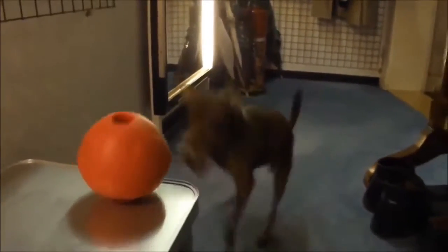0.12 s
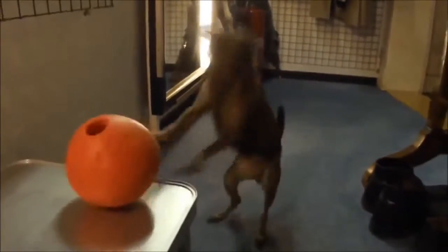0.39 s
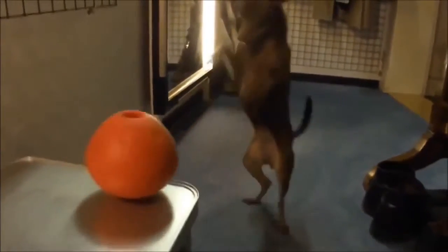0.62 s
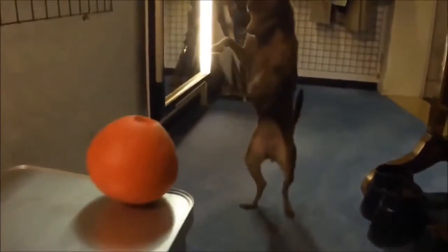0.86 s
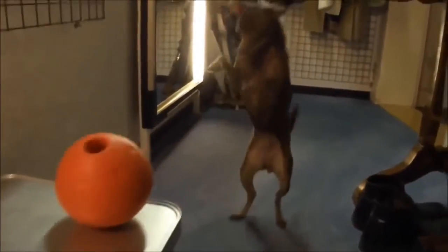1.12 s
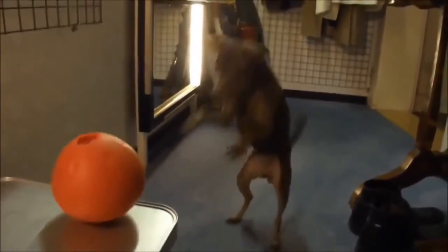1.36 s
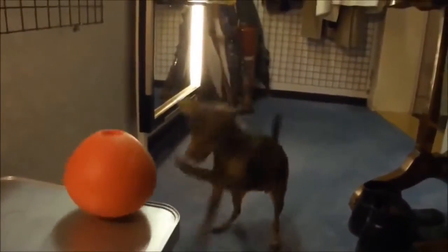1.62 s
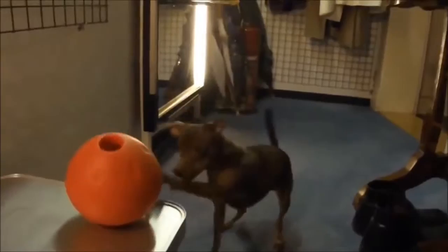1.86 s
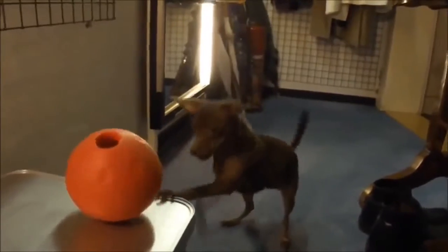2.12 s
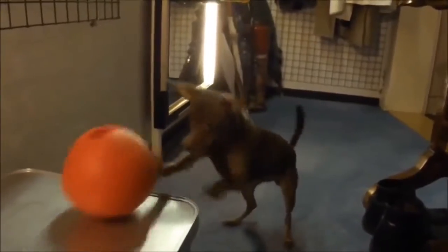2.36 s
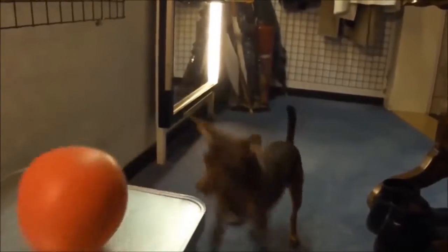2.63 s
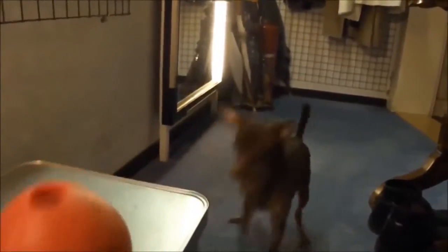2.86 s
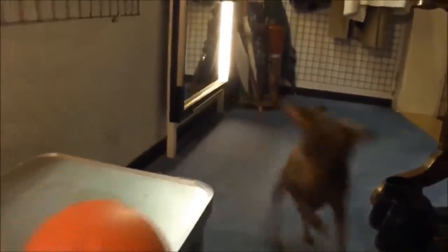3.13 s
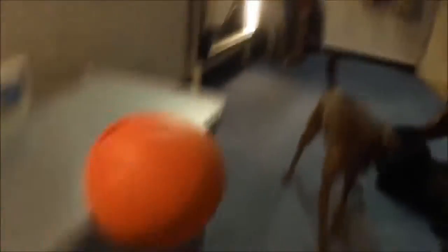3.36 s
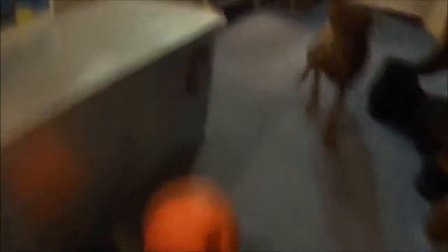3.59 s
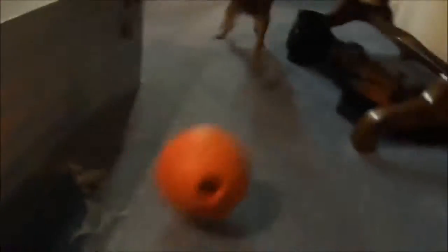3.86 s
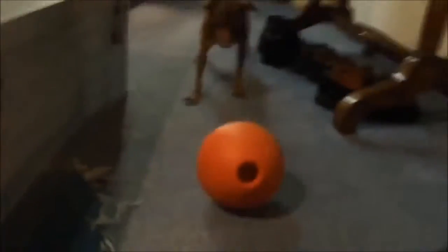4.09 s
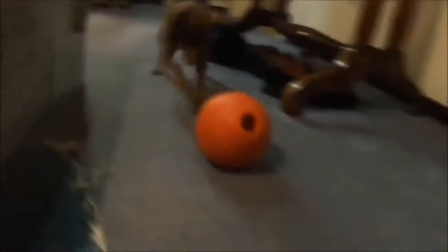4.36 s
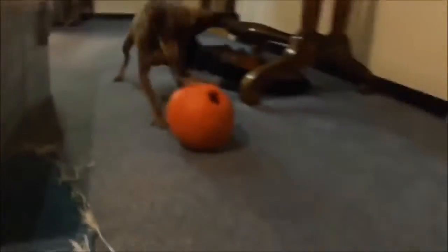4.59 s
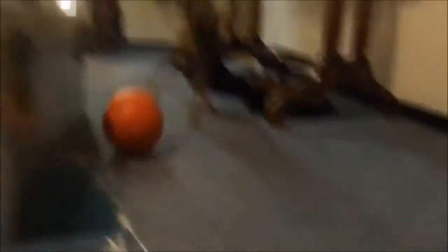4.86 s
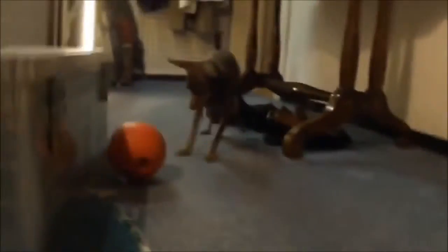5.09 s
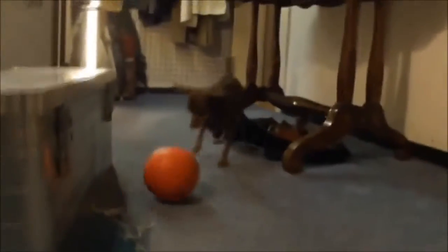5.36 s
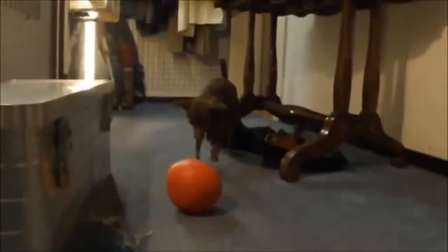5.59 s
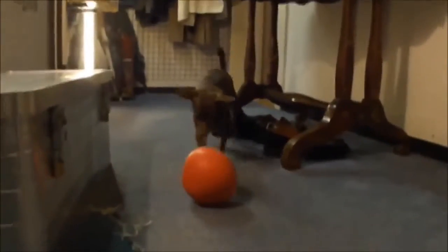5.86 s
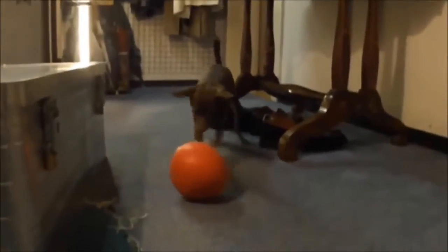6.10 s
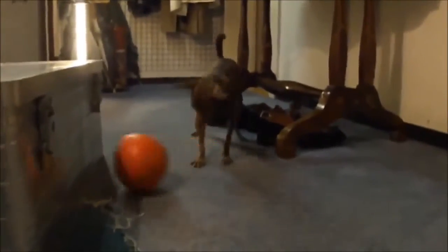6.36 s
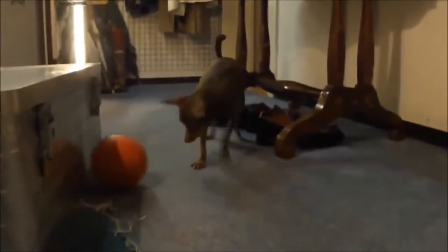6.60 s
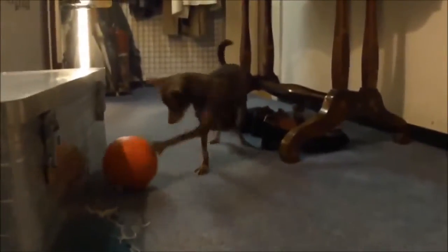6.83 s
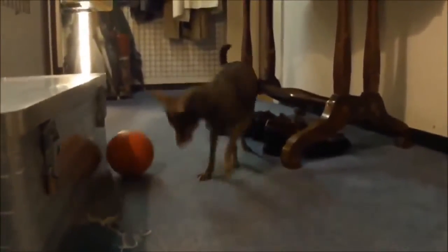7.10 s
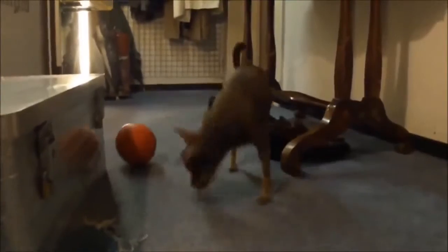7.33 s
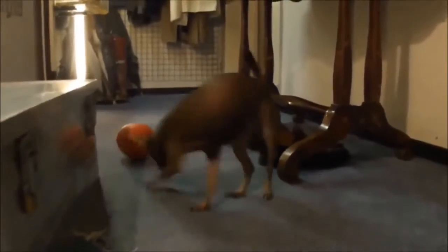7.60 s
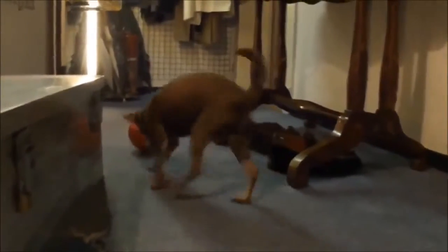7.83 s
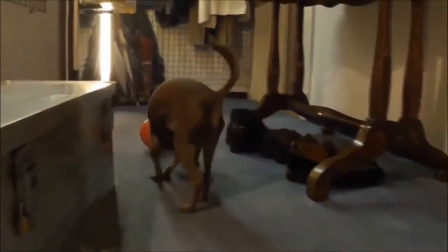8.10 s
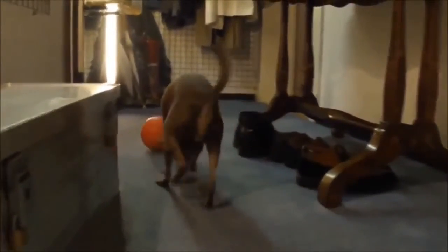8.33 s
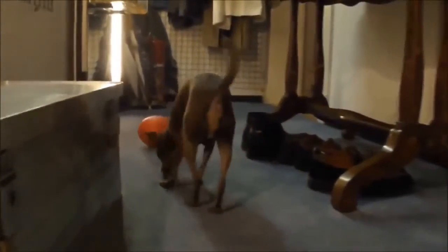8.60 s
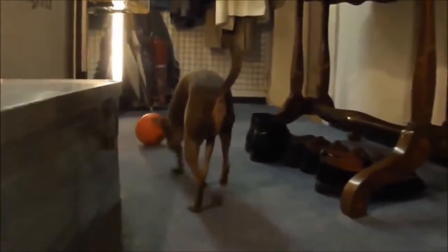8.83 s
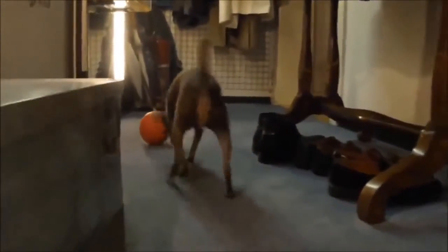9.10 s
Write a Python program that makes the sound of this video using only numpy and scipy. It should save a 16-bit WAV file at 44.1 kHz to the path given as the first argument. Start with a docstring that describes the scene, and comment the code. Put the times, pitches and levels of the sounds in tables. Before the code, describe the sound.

Soft brushing and sparse hollow taps come first, with claws clicking on a metal lid. A busier rattle of pellets leads to two nearly joined, very loud thumps on carpet, more bounces, then rumbling roll and booming knocks against the metal chest. Small scrabbles and ticks end it. Close stereo microphone with a coloured, boxy tone, short room reflections and faint air noise.

```python
"""A small dog brushes past and paws a hollow plastic ball of dry pellets about on a metal chest: low pushes
ring the ball, swelling noise is the thrown pellets, short tocks are single pellets, bright noise is claws.
At 3.7 s the ball leaves the lid and bounces on a thin carpet with the hardest thumps. Then it rolls, in
rumbling and hissing noise with brief tones, and slams into the chest; the last ticks come after 9 s.
Throughout, a small furnished room answers in fading noise, air murmurs, and a narrow microphone colours all."""
import sys
import numpy as np
from scipy import signal
from scipy.fft import rfft, irfft, next_fast_len
from scipy.io import wavfile
from scipy.ndimage import uniform_filter1d

SR = 44100
rng = np.random.default_rng(int(sys.argv[2]) if len(sys.argv) > 2 else 0)


def invert_db(level):
    """Linear amplitude ratio for a level in decibels (20 dB per decade), elementwise."""
    return 10 ** (np.asarray(level, dtype=float) / 20)


def bounce(signal):
    """Save signal as a 16-bit WAV file at the path given by the first command-line argument."""
    frames = np.transpose(np.atleast_2d(signal))
    limited = np.clip(frames, -1, 1)
    pcm = np.round(limited * 32767).astype(np.int16)
    wavfile.write(sys.argv[1], SR, pcm)


N = 406155  # samples in the scene

# Levels in the event tables are those at the source, before the room and the microphone.
# ball and paws landing: (time [s], push [dB], pitch [Hz], shudder [dB], thrown pellets [dB])
THUMPS = [(0.465, -27.5, 654, -48, -34), (0.617, -37, 840, -49, -34), (0.661, -31, 560, -35, -34),
          (0.705, -36, 300, -38, -40), (0.95, -52, 795, -56, -50), (1.051, -24.5, 427, -44, -62),
          (1.16, -27, 363, -44, -52.5), (1.49, -42, 700, -52, -52), (1.62, -48, 600, -60, -48),
          (1.831, -24, 614, -36, -40), (1.932, -32, 455, -37, -41.5), (2.13, -32, 272, -44.5, -46.5),
          (2.234, -13.5, 503, -27, -36.5), (2.575, -40, 606, -45, -60), (2.621, -26, 570, -37, -32),
          (2.72, -34, 568, -37.5, -32), (2.751, -24, 480, -30, -26), (2.768, -14, 540, -29.5, -35),
          (2.864, -11, 700, -35.5, -28), (3.077, -27, 496, -38, -40), (3.35, -41, 460, -49, -39),
          (3.419, -50, 510, -42, -35), (3.544, -29, 460, -53, -31.5), (3.595, -37, 832, -45, -34),
          (3.909, 5, 684, -12.5, -15), (3.949, 2, 760, -21.5, -16.5), (4.182, -1, 280, -18, -14),
          (4.329, -11, 329, -25, -22.5), (4.416, -20.5, 319, -39, -44), (4.814, -40.5, 850, -42, -34),
          (4.876, -31.5, 292, -35, -27), (5.316, -5, 420, -11.5, -12), (5.524, -21, 464, -36, -31.5),
          (5.608, -28, 356, -34, -40), (5.921, -39, 360, -47.5, -51), (6.017, -41, 860, -42, -38),
          (6.09, -30, 885, -45.5, -44), (6.169, -30, 824, -46, -30), (6.367, -27, 300, -38, -35.5),
          (6.459, -29.5, 442, -47, -37.5), (6.753, -35, 438, -52, -46), (6.868, -3.5, 434, -18.5, -20),
          (6.891, -11, 375, -25, -22), (6.997, -18, 466, -37, -32), (7.115, -14, 380, -32.5, -34),
          (7.29, -3.5, 420, -17.5, -20), (7.517, -22.5, 417, -43, -39), (8.032, -39, 716, -49, -34),
          (8.128, -44, 344, -48.5, -40), (8.239, -34, 708, -56, -42.5), (8.479, -55, 643, -55, -42),
          (8.605, -36, 662, -48.5, -39.5), (8.757, -35.5, 856, -59, -43.5)]
# single pellets on the shell: (time [s], level [dB], pitch [Hz], shell ring relative to the tock [dB])
TICKS = [(0.471, -34.5, 950, -17), (0.617, -29, 1860, -17), (0.653, -14, 1830, -17), (0.937, -30, 820, -16),
         (1.054, -33.5, 895, -11), (2.14, -25, 1574, 3), (2.239, -19.5, 1470, 5), (2.396, -27.5, 2160, -30),
         (2.623, -18, 1560, 1.5), (2.715, -22, 1900, -14), (2.737, -26, 1620, 5), (2.756, -18, 1550, -6),
         (2.866, -20, 1700, -10), (2.918, -23.5, 1840, -21), (2.991, -27, 942, -19),
         (3.034, -20, 1950, -2.5), (3.09, -24, 1640, -11), (3.123, -30, 1600, -28), (3.152, -28, 1700, -21),
         (3.184, -17, 2200, -12), (3.26, -12, 1920, -24), (3.342, -13.5, 1800, -8.5),
         (3.382, -22, 1900, -9), (3.427, -19, 1760, -21.5), (3.403, -29, 1700, -15), (3.52, -31, 900, -20),
         (3.549, -22.5, 1740, -24), (3.666, -28, 1700, -15), (3.795, -32, 1990, -15),
         (3.842, -33, 1860, -8), (3.913, -9.5, 1010, 11.5), (4.043, -12, 1870, -10.5), (4.17, -26, 1000, 1),
         (4.186, -8, 1040, -6), (4.2378, -11.5, 2170, -17), (4.328, -22, 1010, -12),
         (4.362, -14.5, 1830, -16), (4.444, -20.5, 2130, -14), (4.504, -23.5, 1880, -4.5),
         (4.804, -30, 950, -14), (4.82, -10, 1050, -20), (4.885, -10, 1890, -12.5), (5.319, -1, 905, -17),
         (5.422, -12.5, 1010, -14), (5.524, -18.5, 1510, 4), (5.61, -25, 1080, -1), (5.676, -30, 1010, -18),
         (5.745, -33, 1087, 15), (5.848, -30.5, 1000, 12), (5.974, -23, 885, -21), (6.022, -28, 996, -14),
         (6.043, -23, 960, -21), (6.095, -25.5, 980, -17), (6.159, -26, 1640, -9),
         (6.175, -17.5, 1610, -12), (6.368, -18.5, 2090, -9), (6.46, -29, 1260, -1), (6.74, -27, 2010, -23),
         (6.758, -23, 1950, -19), (6.8, -32, 1940, -12), (6.873, -3.5, 815, -16), (6.892, -5.5, 980, -17),
         (6.973, -16, 1300, 4), (7.0, -24.5, 1430, -7), (7.121, -20, 1900, -4), (7.27, -36, 1500, -14),
         (7.294, -11, 1140, -16), (7.482, -22.5, 1600, -20), (7.518, -29, 1790, -19),
         (7.559, -17, 2570, -12), (7.592, -26, 1840, -15), (7.989, -38.5, 1080, 14), (8.038, -36, 990, 8),
         (8.08, -30, 1900, -12), (8.12, -26, 2010, -12), (8.158, -30, 2100, -12), (8.191, -30, 2200, -12),
         (8.234, -32, 2200, -14), (8.403, -38, 1850, -8), (8.46, -37, 1920, -4), (8.477, -25, 1940, -17),
         (8.557, -25, 1030, -12), (8.611, -27, 1640, -15), (8.687, -32.5, 1730, -11),
         (9.108, -27.5, 1070, 0), (9.199, -20, 1800, -15)]
# claws and hard edges: (time [s], crack [dB], scratch relative to the crack [dB])
CLAWS = [(0.6528, -5, -6), (2.2416, -21, -4.5), (2.3963, -46, -6), (2.6472, -24.5, -8), (2.7365, -26, 7),
         (2.7555, -8, -3), (2.8513, -20, 2), (2.8667, -16, -9), (2.9091, -18, -7), (3.0333, -48, -10),
         (3.1835, -50, -16), (3.401, -39, -8), (3.4265, -30, -17), (3.5492, -33, -15),
         (3.9198, -13.5, -4.5), (3.9662, -19.5, -7), (4.0974, -41.5, -1.5), (4.1683, -37, -24),
         (4.1942, -9.5, -19), (4.2371, -16, -20), (4.3264, -23, -10), (4.3613, -22, -10),
         (4.5329, -35.5, -22), (4.8193, -28, -10), (4.8851, -34.5, -12), (5.3231, -12.5, -2),
         (5.402, -16.5, -24), (5.4234, -20, -8), (5.5277, -28, -10), (6.1747, -42, -17),
         (6.467, -35.5, -15), (6.8776, -26.5, 2), (6.8926, -14, -12.5), (6.9729, -36, -15),
         (7.0008, -28, -17), (7.2248, -41, -17), (7.2962, -20.5, 1), (7.3106, -16, -16), (7.4284, -39, -14),
         (8.037, -37, -15), (9.0497, -41, -20)]
# fur and pads brushing past: (time [s], level [dB], hold [s])
BRUSHES = [(.235, -39, .09), (.69, -27, .02), (1.3, -60, .3), (2.5, -58, .1), (3.42, -53, .08),
           (3.82, -47, .05), (4.55, -51, .22), (6.47, -52, .07), (7.52, -50, .16)]
# claws scrabbling over the floor in dense runs: (time [s], length [s], loudest nick [dB])
SCRABBLES = [(6.37, .06, -31), (7.54, .1, -32), (8.04, .19, -32), (8.48, .28, -33)]
# the ball rocking and rolling: (time [s], rumble [dB], tumbling pellets [dB])
MOTION = [(0.0, -60, -70), (0.3, -68, -56), (0.43, -66, -66), (0.55, -56, -54), (0.83, -65, -50),
          (1.0, -72, -68), (1.25, -72, -70), (1.7, -66, -56), (2.33, -50, -40), (2.56, -54, -52),
          (2.96, -42, -44), (3.2, -60, -56), (3.7, -55, -52), (4.05, -54, -37), (4.54, -49, -37),
          (4.8, -54, -46), (4.95, -45, -35), (5.14, -45, -38), (5.2, -51, -56), (5.3, -50, -56),
          (5.48, -40, -35), (5.69, -60, -48), (5.87, -47, -50), (6.5, -58, -62), (6.7, -55, -54),
          (6.84, -62, -58), (7.0, -52, -38), (7.1, -58, -56), (7.2, -50, -54), (7.62, -60, -42),
          (7.75, -62, -53), (7.92, -53, -56), (8.12, -57, -50), (8.36, -64, -60), (8.55, -62, -46),
          (8.7, -64, -48), (8.85, -62, -57), (9.21, -58, -51)]
# a rocking ball sings on one resonance: (time [s], length [s], pitch [Hz], first level [dB], last level [dB])
SINGING = [(1.83, .07, 2020, -42, -46), (1.9, .1, 2200, -45, -50), (5.74, .07, 1015, -34, -57),
           (5.845, .13, 1010, -37, -48), (5.98, .05, 990, -46, -50), (6.04, .05, 950, -42, -50),
           (6.095, .06, 1007, -38, -44), (6.265, .05, 1050, -41, -52), (6.375, .06, 1880, -38, -44),
           (8.04, .08, 1002, -48, -50), (8.55, .07, 990, -39, -52)]
# weight landing makes the floor and the chest wall boom: (time [s], level [dB])
BOOMS = [(.67, -47), (1.053, -46), (1.162, -49), (1.835, -49), (1.935, -48), (2.76, -44), (2.98, -50),
         (3.45, -47), (5.325, -32), (6.875, -35), (7.295, -35)]

# ringing tones of the ball's shell: (frequency [Hz], level [dB], time to fall by 60 dB [s])
SHELL_TONES = [(1050, -9, 0.062), (1573, -20, 0.083), (1800, 11.5, 0.023), (2047, 5, 0.033),
               (2400, -15, .04), (3500, -23.5, 0.088)]
# resonances of the chest: (frequency [Hz], width [Hz], level [dB])
CHEST_MODES = [(120, 10, -8.5), (220, 28, 1), (326, 11.4, -7.5), (420, 53, 2.5), (628, 28, -8),
               (720, 42, -4.5)]
# low cut on the pushes, which keeps their onsets free of deep thud: (frequency [Hz], gain [dB])
PUSH_LOW_CUT = [(20, -24), (60, -14), (160, 0), (20000, 0)]

# colour of the rolling ball and the shaking chest: (frequency [Hz], level per Hz [dB])
RUMBLE_COLOUR = [(30, -32), (90, -21.5), (200, -0.5), (400, 3.5), (700, 2), (1200, -21), (3000, -33)]
# colour of many pellets clattering: (frequency [Hz], level per Hz [dB])
PELLET_COLOUR = [(200, -32), (500, -2.5), (1000, 3), (2000, 1), (2800, -2), (6000, -19.5), (10000, -50),
                 (16000, -44.5)]
# colour of scratching on the carpet and of pellets sliding: (frequency [Hz], level per Hz [dB])
SCRATCH_COLOUR = [(500, -46), (2000, -15), (4000, -4), (7000, 0), (10000, -8.5), (16000, -5)]
# colour of scratching on the bare metal lid: (frequency [Hz], level per Hz [dB])
LID_COLOUR = [(500, -19), (2000, -1), (4000, -2.5), (7000, -4.5), (10000, -2), (16000, 2)]
# colour of a claw's first crack: (frequency [Hz], level per Hz [dB])
CRACK_COLOUR = [(400, -23.5), (1000, -23), (2500, -3.5), (7000, 0), (10000, -5), (16000, -11.5)]
# colour of the deep booms: (frequency [Hz], level per Hz [dB])
BOOM_COLOUR = [(30, -36), (80, -20), (130, 0), (200, -2), (300, -18), (600, -60)]
# colour of the quiet air: (frequency [Hz], level per Hz [dB])
AIR_COLOUR = [(30, -49.5), (100, -15.5), (330, -4), (1000, -6), (2300, -13), (6000, -22), (10000, -24),
              (16000, -25.5)]

# how alike left and right are for contacts and the room: (frequency [Hz], likeness [0 to 1])
CONTACT_LIKENESS = [(100, .996), (400, .99), (1000, .96), (2000, .88), (4000, .6), (8000, .4), (14000, .1)]
# how alike left and right are for the air: (frequency [Hz], likeness [0 to 1])
AIR_LIKENESS = [(100, 0.2), (1000, 0.1), (6000, 0.051)]
# how long the room answers: (frequency [Hz], time to fall by 60 dB [s])
ROOM_FADE = [(150, 0.24), (700, 0.3), (2000, 0.41), (6000, 0.47), (12000, 0.43)]
# the microphone behind its port: (frequency [Hz], gain [dB])
MIC_GAIN = [(30, -4), (150, -2.5), (2200, -2.5), (2650, -12.5), (3020, -21.5), (3450, -15), (4050, -20),
            (4500, -14.5), (5000, -16.5), (5500, -9), (6300, -2.5), (9500, -4.5), (10800, -12),
            (12000, -27.5), (15400, -18), (16500, -33), (17000, -95)]
# narrow cancellations in the port: (frequency [Hz], width [Hz])
PORT_NOTCHES = [(3030, 260), (4050, 260), (5030, 220)]

# T60 is the time to fall by 60 dB.
FALL_S = 3.7  # the ball leaves the lid
BOUNCE_START_S, BOUNCE_END_S = 3.7, 4.85
SLAM_DB = -20  # after the bouncing, blows that shudder louder than this meet the chest wall
CARPET_DAMPS, WALL_PROLONGS = .75, 1.55  # factors on the thrown pellets' T60; the shudder takes their roots
SHUDDER_T60_S, THROWN_T60_S, HOLLOW_T60_S = .36, .23, .26  # the first two before those factors
HOLD_S, HOLD_S_PER_DB = .013, .0003  # how long a -40 dB shudder is held; harder ones longer
TICK_CYCLES = 1.9  # sets the length of the rounded tock
TICK_RATTLE_DB, TICK_RATTLE_T60_S = -15, .04  # the dry rattle, relative to its tock
STRAY_COUNT, STRAY_HZ, STRAY_DB = 130, 1750, 8  # middle pitch; loudest level over the tumbling
SCRABBLE_COUNT, SCRABBLE_HZ = 24, 2050  # nicks in a run; their middle pitch
DRAG_S, DRAG_T60_S, BRUSH_T60_S = .017, .15, .45  # hold of a dragging claw, then the fades
HISS_DB = -18  # sliding pellets, relative to their tumbling
BOOM_T60_S = .32
SINGING_SAG = .05  # share of its starting pitch that a tone loses per second


def unit(x):
    """Scales a sound to an rms strength of 1."""
    return x / np.sqrt(np.mean(x ** 2) + 1e-20)


def along(points, hz):
    """Reads a curve of (frequency, value) points on a logarithmic frequency axis."""
    f, v = np.transpose(points)
    return np.interp(np.log(hz + 1), np.log(f + 1), v)


def filtered(x, response):
    """Multiplies the spectrum of x by a function of frequency."""
    size = next_fast_len(N + SR // 2)
    spectrum = rfft(x, size) * response(np.fft.rfftfreq(size, 1 / SR))
    return irfft(spectrum, size)[..., :N]


def causal(points, hz):
    """Turns (frequency, dB) points into a minimum-phase filter, which cannot answer before it is struck."""
    cepstrum = irfft(np.log(invert_db(along(points, hz))))
    cepstrum[1:len(hz) - 1] *= 2
    cepstrum[len(hz):] = 0
    return np.exp(rfft(cepstrum))


def resonant(modes, f):
    """Adds up damped resonances, each answering most strongly at its own frequency."""
    total = 0
    for k, (centre, width, db) in enumerate(modes):
        peak = 1j * f * width / (centre * centre - f * f + 1j * f * width)
        total = total + (-1) ** k * invert_db(db) * peak
    return total


def spread(pair, gain, likeness):
    """Mixes two unrelated signals into a left and right that are as alike as the table says."""
    def weights(hz):
        turn = np.arccos(np.clip(along(likeness, hz), -1, 1)) / 2
        return gain(hz) * np.array([np.cos(turn), np.sin(turn)])

    mid, side = filtered(pair, weights)
    return np.array([mid + side, mid - side])


def grit(colour, per_s, spread_db, smooth, patchy_db, likeness=CONTACT_LIKENESS):
    """Stereo noise of rms 1: random contacts of uneven size over smooth noise, in patches of changing colour."""
    size_db = spread_db * np.minimum(rng.exponential(size=N), 2)
    contacts = (rng.random(N) < per_s / SR) * invert_db(size_db)
    strength = unit(uniform_filter1d(contacts, size=70)) + smooth
    pair = rng.standard_normal((2, N)) * strength
    # smoothed random gains over frequency and time make the patches
    z = signal.stft(pair, nperseg=1024)[2]
    patches = uniform_filter1d(rng.standard_normal(z.shape[1:]), size=7, axis=0)
    patches = uniform_filter1d(patches, size=3, axis=1)
    pair = signal.istft(z * invert_db(patchy_db * unit(patches)), nperseg=1024)[1][:, :N]
    return unit(spread(pair, lambda hz: invert_db(along(colour, hz)), likeness))


def swell(s, db, t60, rise, hold):
    """Envelope of bursts that rise fast, hold and die away (times in seconds); their powers add."""
    power, t = np.zeros(N + SR), np.arange(SR // 2) / SR
    for start, level, length, wait in np.broadcast(s, db, t60, hold):
        fall_db = 60 * np.maximum(t - wait, 0) / max(length, .01)
        burst = invert_db(level - fall_db) * (1 - np.exp(-t / rise))
        power[round(start * SR):][:len(t)] += burst ** 2
    return np.sqrt(power[:N])


def blip(hz, cycles, t):
    """A rounded contact: a few cycles that swell and vanish, with a peak near 1."""
    u = t * hz / cycles
    return u * np.exp(1 - u) * np.exp(-.3 * u * u) * np.sin(2 * np.pi * hz * t)


def quiet_air():
    """Steady, faint noise, nearly unrelated in the two ears."""
    return invert_db(-53) * grit(AIR_COLOUR, per_s=300, spread_db=7, smooth=6, patchy_db=.5, likeness=AIR_LIKENESS)


def room(x):
    """The room answers with dense echoes, like noise in which each frequency dies at its own speed."""
    hz, t, z = signal.stft(rng.standard_normal((2, SR // 2)), SR, nperseg=256)
    fade = invert_db(-60 * t / along(ROOM_FADE, hz)[:, None])
    tail = signal.istft(z * fade, SR, nperseg=256)[1]
    delayed = np.pad(x.mean(0), (200, 0))[None]  # samples before the first echo
    wet = signal.fftconvolve(delayed, tail / np.linalg.norm(tail[0]), axes=1)[:, :N]
    return spread(wet, np.ones_like, CONTACT_LIKENESS)


def booms():
    """Landing weight makes the boards answer with deep, dull noise."""
    s, db = np.transpose(BOOMS)
    noise = grit(BOOM_COLOUR, per_s=60, spread_db=1.5, smooth=3, patchy_db=1.5)
    return swell(s, db, BOOM_T60_S, rise=.006, hold=.03) * noise


def motion():
    """The rolling ball rumbles while its pellets tumble, and hiss as they slide along the shell."""
    s, *columns = np.transpose(MOTION)
    rumble, tumble = (invert_db(np.interp(np.arange(N) / SR, s, db)) for db in columns)
    rolling = rumble * grit(RUMBLE_COLOUR, per_s=84, spread_db=2, smooth=1.14, patchy_db=4.5)
    tumbling = tumble * grit(PELLET_COLOUR, per_s=260, spread_db=0, smooth=2.9, patchy_db=3.5)
    sliding = grit(SCRATCH_COLOUR, per_s=800, spread_db=3, smooth=4.3, patchy_db=.5)
    return rolling + tumbling + tumble * invert_db(HISS_DB) * sliding


def singing():
    """Rough contact excites one narrow resonance: a tone whose strength and phase wander."""
    out = np.zeros(N)
    for s, length, hz, first_db, last_db in SINGING:
        t = np.arange(round(length * SR)) / SR
        wander = uniform_filter1d(rng.standard_normal((2, SR // 2)), size=550, axis=1)[:, :len(t)]
        turning = np.exp(2j * np.pi * hz * t * (1 - SINGING_SAG * t / 2))
        tone = unit(((wander[0] + 1j * wander[1]) * turning).real)
        level = invert_db(np.linspace(first_db, last_db, len(t)))
        out[round(s * SR):][:len(t)] += level * tone * signal.windows.tukey(len(t), .15)
    return out


def claws_and_fur():
    """Claws crack and then drag, brighter on bare metal than on carpet; fur brushes past more slowly."""
    s, db, drag_db = np.transpose(CLAWS)
    snap = 1.15 * swell(s, db, .018, rise=.0003, hold=0)
    crack = snap * grit(CRACK_COLOUR, per_s=490, spread_db=0, smooth=1.3, patchy_db=3)
    lid, carpet = (grit(colour, per_s=1100, spread_db=5, smooth=1.2, patchy_db=3.5)
                   for colour in (LID_COLOUR, SCRATCH_COLOUR))
    surface = np.where(np.arange(N) < FALL_S * SR, lid, carpet)
    t60 = np.repeat([DRAG_T60_S, BRUSH_T60_S], [len(CLAWS), len(BRUSHES)])
    drags = [s, db + drag_db, np.full(len(s), DRAG_S)]
    s, db, hold = np.hstack([drags, np.transpose(BRUSHES)])
    return crack + swell(s, db, t60, rise=.011, hold=hold) * surface


def scrabbles():
    """Makes tick rows for the many small nicks of each claw run, uneven in time, size and pitch."""
    luck = rng.random((len(SCRABBLES), SCRABBLE_COUNT, 3))
    rows = []
    for (s, length, db), run in zip(SCRABBLES, luck):
        for a, b, c in run:
            pitch_hz = SCRABBLE_HZ * np.exp(.45 * (c - .5))
            rows.append((s + length * a, db - 12 * b, pitch_hz, -15))
    return rows


def strays():
    """Makes tick rows for small pellets that drop at random, their level following the tumbling."""
    luck = rng.random((STRAY_COUNT, 3))
    s, _, tumble_db = np.transpose(MOTION)
    when = luck[:, 0] * N / SR
    db = np.interp(when, s, tumble_db) + STRAY_DB - 14 * luck[:, 1]
    pitch_hz = STRAY_HZ * np.exp(.6 * (luck[:, 2] - .5))
    return list(zip(when, db, pitch_hz, np.full(len(when), -12.5)))


def ticks():
    """Each pellet or nick gives a rounded tock and rings the shell, mostly near its own pitch."""
    out, t = np.zeros(N + SR), np.arange(SR // 12) / SR
    rows = TICKS + strays() + scrabbles()
    scatter_db = rng.normal(0, 2.3, (len(rows), len(SHELL_TONES)))
    for (s, db, pitch_hz, ring_db), luck in zip(rows, scatter_db):
        ring = np.zeros(len(t))
        for (hz, level, t60), extra in zip(SHELL_TONES, luck):
            off_pitch_db = 118 * abs(np.log(hz / pitch_hz))
            ring += invert_db(level + extra - off_pitch_db - 60 * t / t60) * np.sin(2 * np.pi * hz * t)
        ring *= invert_db(ring_db) * (1 - np.exp(-t / .0016))
        out[round(s * SR):][:len(t)] += invert_db(db) * (blip(pitch_hz, TICK_CYCLES, t) + ring)
    s, db = np.transpose(rows)[:2]
    rattle = grit(PELLET_COLOUR, per_s=900, spread_db=3, smooth=1.4, patchy_db=1.5)
    return out[:N] + swell(s, db + TICK_RATTLE_DB, TICK_RATTLE_T60_S, rise=.0004, hold=0) * rattle


def thumps():
    """A short push rings the hollow ball and shakes the chest, which shudders on; pellets fly and clatter."""
    push, t = np.zeros(N + SR), np.arange(SR // 6) / SR
    s, db, hz, shudder_db, thrown_db = np.transpose(THUMPS)
    s = s + .0025  # each push starts slightly after its listed time
    for start, level, pitch, after_db in zip(s, db, hz, shudder_db):
        hollow = invert_db(after_db - 2.5 - 60 * t / HOLLOW_T60_S) * np.sin(2 * np.pi * pitch * t)
        push[round(start * SR):][:len(t)] += invert_db(level) * blip(pitch, 1.0, t) + hollow
    push = filtered(push[:N], lambda f: causal(PUSH_LOW_CUT, f))

    def chest(x):
        return filtered(x, lambda f: resonant(CHEST_MODES, f))

    after_bouncing = np.where(shudder_db > SLAM_DB, WALL_PROLONGS, 1)
    lasts = np.where(s < BOUNCE_START_S, 1, np.where(s < BOUNCE_END_S, CARPET_DAMPS, after_bouncing))
    hold = np.maximum(HOLD_S + HOLD_S_PER_DB * (shudder_db + 40), 0)
    fling = .002  # s for the pellets to leave the shell; the heavier chest takes twice as long
    shaking = grit(RUMBLE_COLOUR, per_s=150, spread_db=3.5, smooth=1.67, patchy_db=3)
    shaking = unit(shaking + 1.74 * chest(shaking))
    shudder = swell(s, shudder_db, SHUDDER_T60_S * np.sqrt(lasts), 2 * fling, hold) * shaking
    flying = grit(PELLET_COLOUR, per_s=700, spread_db=2.5, smooth=1.6, patchy_db=2.5)
    thrown = swell(s, thrown_db, THROWN_T60_S * lasts, fling, hold) * flying
    return push + 1.36 * chest(push) + shudder + thrown


def scene():
    """Adds the contacts, the room's answer to them, the rolling and the air, slightly louder on the left."""
    near = booms() + thumps() + ticks() + claws_and_fur() + singing()
    mix = near + invert_db(-16) * room(near) + motion() + quiet_air()
    return mix * invert_db([[.2], [-.2]])


def band_limit(x):
    """A steep low-pass at the top of the band."""
    return signal.sosfilt(signal.butter(12, 16990, fs=SR, output="sos"), x)


def record(dry):
    """The microphone's port colours the sound and cuts narrow notches; peaks near full scale are rounded."""
    def notch(f, centre, width):
        detune = centre * centre - f * f
        return (detune + .3j * f * width) / (detune + 1j * f * width)

    def microphone(hz):
        return causal(MIC_GAIN, hz) * np.prod([notch(hz, *row) for row in PORT_NOTCHES], axis=0)

    x = filtered(dry, microphone)
    mixed = x / (1 + np.abs(x / .98) ** 6) ** (1 / 6)
    return band_limit(mixed)


dry = scene()
out = record(dry)
bounce(out)
```